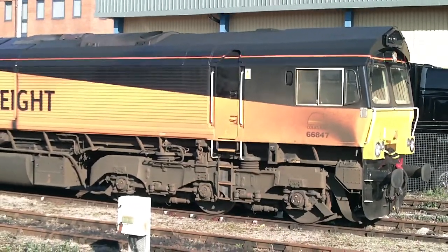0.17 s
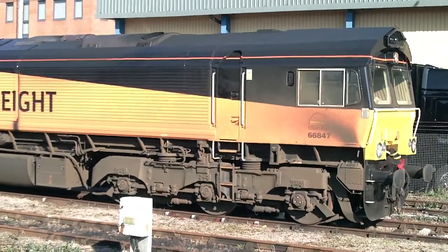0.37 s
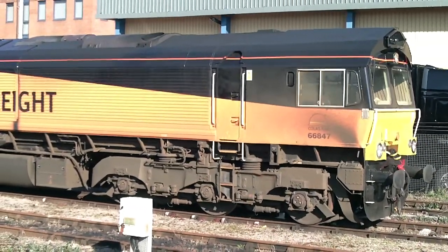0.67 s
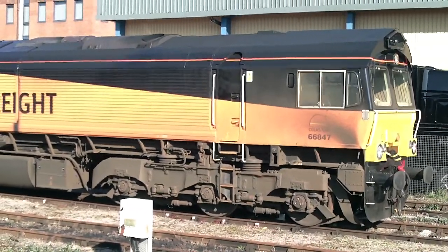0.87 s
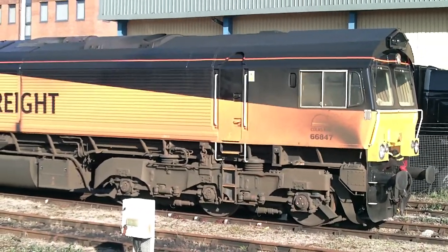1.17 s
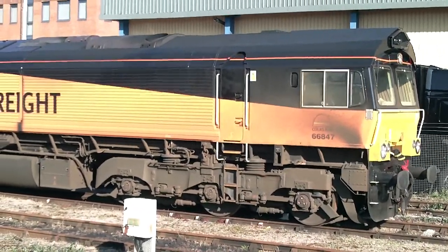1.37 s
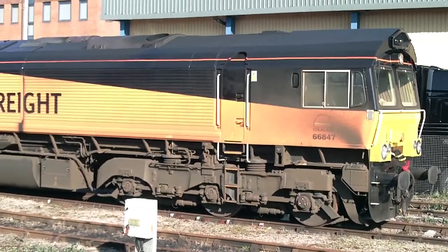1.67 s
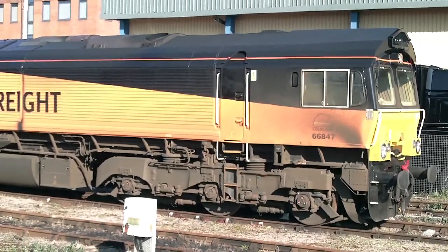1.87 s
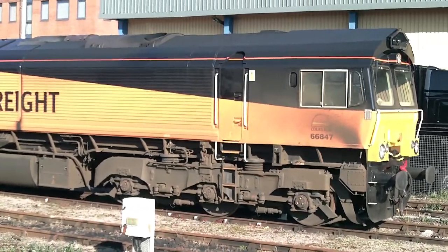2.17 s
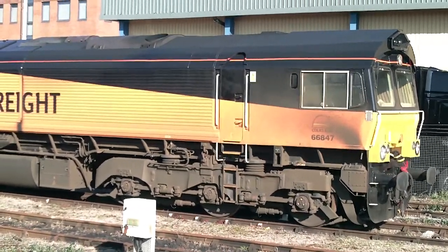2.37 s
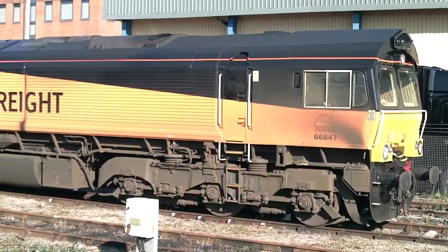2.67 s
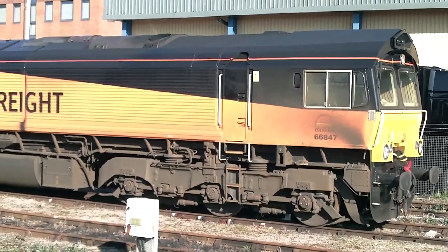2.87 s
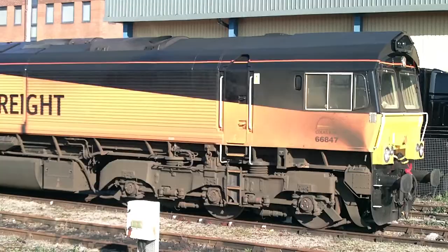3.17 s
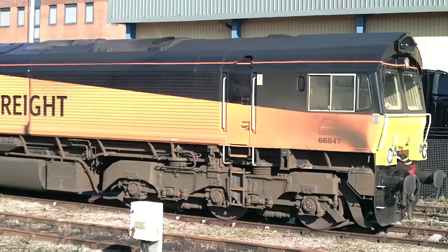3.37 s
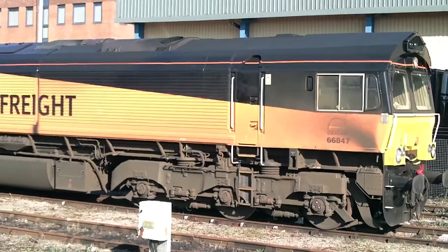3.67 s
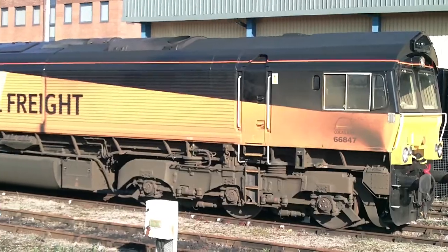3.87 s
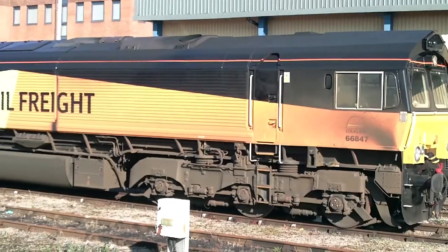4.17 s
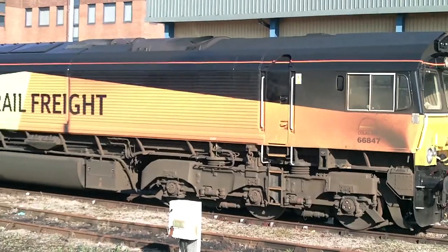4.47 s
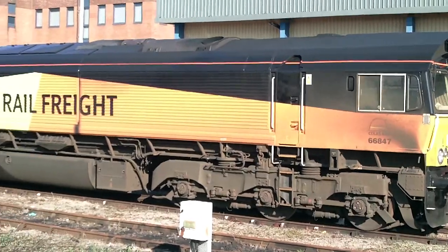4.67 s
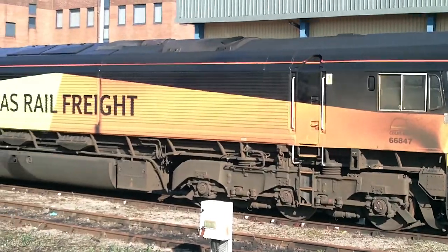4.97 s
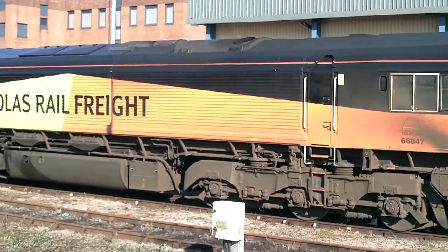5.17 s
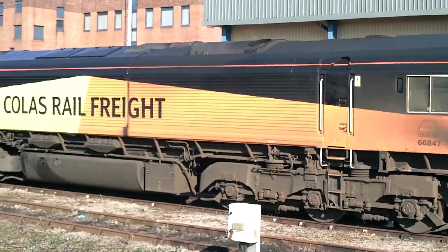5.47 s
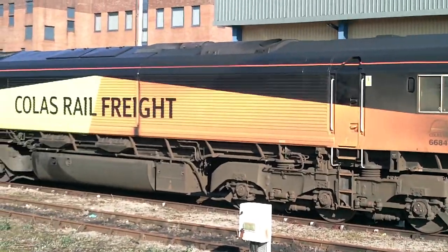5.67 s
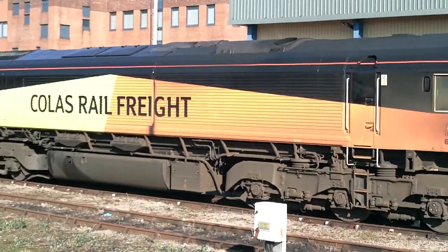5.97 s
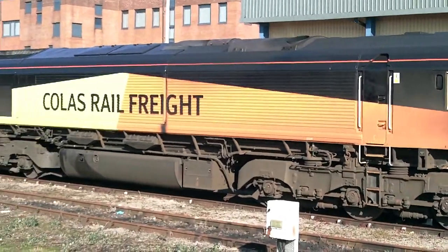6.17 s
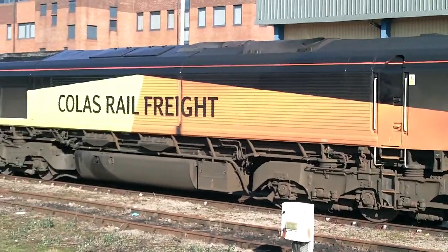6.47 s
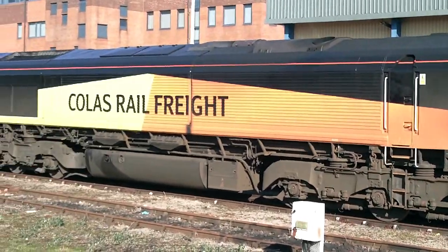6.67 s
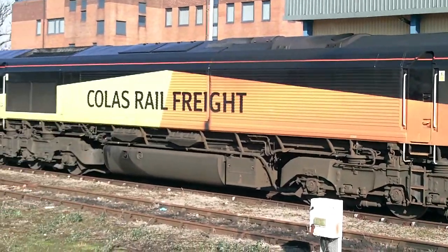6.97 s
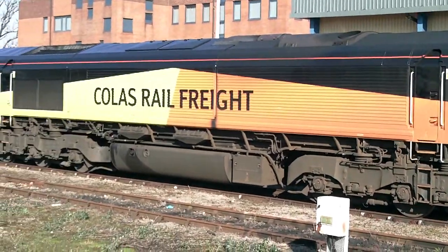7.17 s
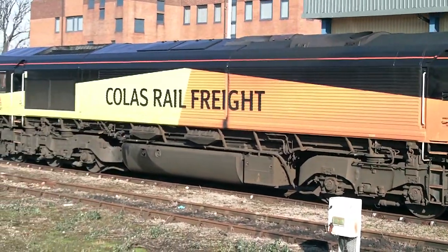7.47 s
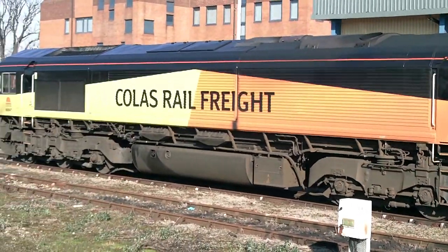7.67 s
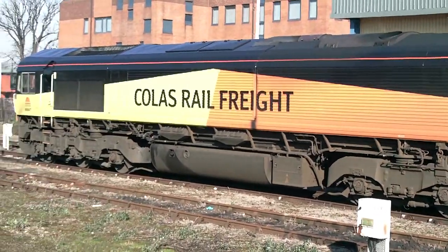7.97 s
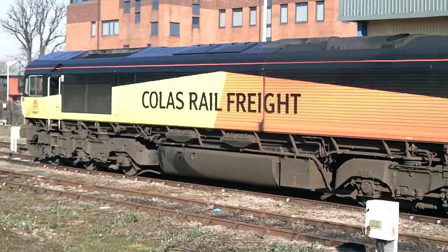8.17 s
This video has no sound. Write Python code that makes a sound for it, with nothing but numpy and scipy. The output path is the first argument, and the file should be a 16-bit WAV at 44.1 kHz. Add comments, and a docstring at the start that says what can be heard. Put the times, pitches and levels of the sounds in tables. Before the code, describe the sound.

Steady locomotive idle, fairly close, outdoors, captured by a stereo microphone pair. Low booming exhaust pulses and rattling engine knocks cycle rapidly without changing speed, beneath pulsing gear tones and a constant high whistle. A quick burst of compressed air comes just after the start and dies away fast. Later the airy treble brightens slightly, with two barely audible thin squeals. No voices.

```python
"""A big two-stroke diesel locomotive idles in a rail yard, heard from the side of the track.
Every crank turn repeats, slightly varied, the same exhaust beats and knocks as pulses ringing resonant modes.
Valve gear taps clatter, and gear tones and harmonics follow the crank as sines. The turbocharger whistles as
smeared tones above a steady roar of coloured noise. An air valve lets off short hisses of resonant noise,
and a faint thin squeal twice glides up and back down."""
import sys
import numpy as np
from scipy import signal
from scipy.fft import rfft, irfft, next_fast_len
from scipy.io import wavfile

SR = 44100
rng = np.random.default_rng(int(sys.argv[2]) if len(sys.argv) > 2 else 0)


def to_wav(sig):
    """Store sig (one row per channel, or 1-D mono) as 16-bit WAV at the path in sys.argv[1].

    Samples outside -1..1 are clipped; the rate is SR.
    """
    pcm = np.clip(np.atleast_2d(sig), -1, 1) * 32767
    pcm = np.round(pcm).astype(np.int16)
    wavfile.write(sys.argv[1], SR, pcm.T)  # frames by channels


N = 367794
TIME = np.arange(N) / SR
SIZE = next_fast_len(N + SR)
HZ = np.maximum(np.arange(SIZE // 2 + 1) * SR / SIZE, 1)


def amp(db):
    """dB to gain."""
    return 10 ** (np.asarray(db) / 20)


def rms_one(x):
    """Scale to rms 1."""
    return x / np.sqrt(np.mean(x ** 2) + 1e-20)


def in_time(rows):
    """Columns of a curve table at every sample."""
    s, *columns = np.transpose(rows)
    return [np.interp(TIME, s, column) for column in columns]


def at_hz(points):
    """A spectrum table at every FFT bin, straight lines over log frequency."""
    hz, value = np.transpose(points)
    return np.interp(np.log(HZ), np.log(hz), value)


def band(x, kind, hz, order=4):
    """Butterworth filter."""
    return signal.sosfilt(signal.butter(order, hz, kind, fs=SR, output="sos"), x)


def drift(rate_hz):
    """Slow chance: noise at every eighth sample, twice through a one-pole low-pass; spread 1."""
    r = np.exp(-2 * np.pi * rate_hz * 8 / SR)
    noise = rng.standard_normal(N // 8 + 6002)
    slow = signal.lfilter([1], [1, -2 * r, r * r], noise)[6000:]  # drop the filter's start
    return np.interp(np.arange(N) / 8, np.arange(len(slow)), rms_one(slow - slow.mean()))


def stereo_noise(spectrum, likeness):
    """Coloured noise, partly alike in both channels."""
    alike = np.clip(likeness, 0, 1)
    mid, side = rfft(rng.standard_normal((2, SIZE))) * amp(at_hz(spectrum))
    pair = np.sqrt(1 + alike) * mid + np.sqrt(1 - alike) * side * [[1], [-1]]
    return irfft(pair, SIZE)[:, :N] / np.sqrt(2)


def whine(hz, width_hz):
    """A tone smeared into a narrow band: a sine times slow noise in two phases."""
    phase = 2 * np.pi * np.cumsum(np.broadcast_to(hz, N)) / SR
    return drift(width_hz) * np.cos(phase) + drift(width_hz) * np.sin(phase)


def ring(clicks, hz, level_db, t60_s):
    """A two-pole resonator: every click sets off a decaying sine."""
    r = 10 ** (-3 / (t60_s * SR))
    w = 2 * np.pi * hz / SR
    return signal.lfilter([0, amp(level_db) * np.sin(w)], [1, -2 * r * np.cos(w), r * r], clicks)


RUN_IN_TURNS = 3  # the engine is already ringing at the start


def looped(contacts, modes, turns, uneven, jitter_s):
    """The contacts of one turn, repeated every turn with small changes, ring a set of modes."""
    degrees, strength = np.transpose(contacts)
    lead = int(RUN_IN_TURNS / turns[0])
    turns = np.r_[turns[0] * np.arange(1 - lead, 1), turns]
    due = np.arange(-RUN_IN_TURNS, int(turns[-1]) + 1)[:, None] + degrees / 360
    at = np.interp(due, turns, np.arange(lead + N))
    at += jitter_s * SR * rng.standard_normal(due.shape)
    sizes = strength * (1 + uneven * rng.standard_normal(due.shape))
    played = due < turns[-1]
    clicks = np.full(lead + N, 1e-18)
    np.add.at(clicks, np.clip(at[played].astype(int), 0, lead + N - 1), sizes[played])
    return sum(ring(clicks, *mode) for mode in modes)[lead:]


def with_answer(contacts, answer):
    """Every contact is followed by a weaker copy of itself, turned over by a negative share."""
    later, share = answer
    return contacts + [(degrees + later, strength * share) for degrees, strength in contacts]


IDLE_TURNS_PER_S, SAG_TURNS_PER_S, RECOVERY_S = 5.71851, .015172, 2.58


def crankshaft():
    """Turns so far: the crank starts a little slow and recovers exponentially to governed idle speed."""
    return np.cumsum(IDLE_TURNS_PER_S - SAG_TURNS_PER_S * np.exp(-TIME / RECOVERY_S)) / SR


# exhaust beats in one turn, pushes and pulls: crank_deg, signed_strength (relative)
EXHAUST_BEATS = [(16.0, .05), (52.8, .08), (80.9, -.12), (88.5, .06), (96.3, -.12), (113.2, -.08),
                 (121.4, .13), (148.6, .05), (166.6, .19), (192.1, .07), (211.0, .08), (243.3, .12),
                 (254.3, .15), (288.5, .12), (307.8, .07), (312.2, -.11), (337.1, -.05), (343.2, -.08),
                 (346.1, .08), (354.6, -.1)]
# suction after every beat: later_deg, share (of the beat)
SUCTION = (19.5, -.77)
# silencer resonances: mode_hz, level_db (relative), t60_s
SILENCER_MODES = [(43.5, -1.6, .174), (70, 1.5, .142), (87.5, -9.2, .23), (139.7, -16.7, .156),
                  (182.1, -5.2, .075), (283.4, -5, .058)]


def exhaust(turns):
    """Pressure pulses, each answered by suction, boom through the silencer's low modes."""
    beats = with_answer(EXHAUST_BEATS, SUCTION)
    boom = looped(beats, SILENCER_MODES, turns, uneven=.12, jitter_s=.00015)
    return amp(0.9) * band(boom, "low", 340)


# knocks of pistons, valves and injectors in one turn: crank_deg, signed_strength (relative)
ENGINE_KNOCKS = [(14.9, .14), (29.7, .16), (37.8, -.1), (42.8, .11), (49.5, .08), (55.4, .17), (68.9, .13),
                 (76.6, .19), (92.0, -.11), (100.9, .16), (107.3, -.1), (119.4, .11), (126.0, .23),
                 (131.3, .14), (138.4, .25), (143.5, -.23), (154.5, .17), (165.8, -.12), (180.6, -.07),
                 (187.2, .08), (196.3, .1), (204.9, -.1), (212.6, -.1), (218.4, -.1), (232.2, -.12),
                 (241.8, .11), (253.7, -.14), (258.2, .31), (265.6, .18), (277.1, -.08), (289.6, -.1),
                 (294.5, .15), (306.9, .08), (317.0, .29), (336.5, .11), (354.0, -.15)]
# rebound after every knock: later_deg, share (of the knock)
REBOUND = (5.15, -.68)
# engine block resonances: mode_hz, level_db (relative), t60_s
BLOCK_MODES = [(473.6, -7.1, .12), (550.9, -20.9, .118), (621.6, -6.4, .025), (664.4, -14, .197),
               (703.3, -7.7, .103), (740.9, -32.4, .59), (877.8, -29.3, .3)]


def knocks(turns):
    """Mechanical impacts, each with a rebound, ring the engine block above the exhaust."""
    impacts = with_answer(ENGINE_KNOCKS, REBOUND)
    rattle = looped(impacts, BLOCK_MODES, turns, uneven=.1, jitter_s=.00002)
    return band(rattle, "band", [360, 940])


# short metallic valve gear taps in one turn: crank_deg, ring_hz, level_db
VALVE_GEAR_TAPS = [(20, 2950, -39), (90, 1815, -30), (97, 2950, -40), (110, 1352, -25), (133, 2000, -35),
                   (140, 2960, -38), (255, 1900, -37), (318, 1340, -33)]
TAP_T60_S = 0.094


def clatter(turns):
    """Each tap returns every turn, a little early or late, and rings briefly at its own pitch."""
    out = np.zeros(N)
    for degrees, hz, level_db in VALVE_GEAR_TAPS:
        out += looped([(degrees, 1)], [(hz, level_db, TAP_T60_S)], turns, uneven=.25, jitter_s=.00005)
    return out


# clean harmonics of the crank that stand out of the beats: cycles_per_turn, level_db (rms, before wavering)
CRANK_HARMONICS = [(18, -34), (19, -43), (20, -44), (21, -38), (36, -37), (38, -44), (45, -40), (54, -45),
                   (57, -44), (59, -44), (66, -46), (72, -47), (73, -46), (90, -47), (136, -47), (139, -47),
                   (140, -49), (141, -47), (142, -46), (144, -40), (157, -43), (237, -49), (315, -59),
                   (325, -55), (340, -57)]


def harmonics(turns):
    """Sines locked to the crank, wavering a little in level and barely in phase."""
    out = np.zeros(N)
    for per_turn, level_db in CRANK_HARMONICS:
        gain = np.sqrt(2) * amp(level_db + drift(3.0))
        out += gain * np.sin(2 * np.pi * per_turn * turns + .002 * per_turn * drift(3.0))
    return out


# the loudest gear tone: cycles_per_turn, start_rad, load_peak_deg (crank angle), load_lag_rad
MAIN_GEAR_TONE = (117.255, -1.03, 78, .63)
MAIN_GEAR_DB, MAIN_GEAR_SWELL_DB = -30.5, 6


def main_gear(turns):
    """A steady ringing tone; once a turn the load swells it and holds it back a little."""
    per_turn, start, degrees, lag = MAIN_GEAR_TONE
    load = np.cos(2 * np.pi * (turns - degrees / 360))
    phase = 2 * np.pi * per_turn * turns + start - lag * load + 0.29 * drift(3.3)
    level_db = MAIN_GEAR_DB + MAIN_GEAR_SWELL_DB * load + drift(4.4)
    return np.sqrt(2) * amp(level_db) * np.sin(phase)


# gear trains and auxiliaries: cycles_per_turn
GEAR_TONES = [17.745, 58, 81.7, 84.75, 200, 227, 234.51, 353, 468.8, 504, 516, 525, 552, 570, 586, 624, 636]
# load on each of those tones: level_db (rms, before the swell), swell_db (once a turn), swell_peak_deg
GEAR_LOADS = [(-35, 0, 0), (-41, 0, 0), (-45, 0, 0), (-48, 0, 0), (-46, .6, 120), (-47, 4, 120),
              (-43, 6, 105), (-51, 5, 110), (-55, 2, 80), (-57, 4, 80), (-52.5, 7, 80), (-54, 4, 90),
              (-58, 3, 70), (-56, 3, 70), (-52, 7, 90), (-59, 2, 20), (-61, 2, 20)]


def gears(turns):
    """Meshing teeth follow the crank; the load on them swells once a turn, backlash makes them waver."""
    out = np.zeros(N)
    for per_turn, (level_db, swell_db, degrees) in zip(GEAR_TONES, GEAR_LOADS):
        load_db = swell_db * np.cos(2 * np.pi * (turns - degrees / 360)) + 1.4 * drift(8.0)
        backlash = 0.002 * per_turn * drift(4.25)  # radians, more for finer teeth
        out += amp(level_db + load_db) * np.sin(2 * np.pi * per_turn * turns + backlash)
    return np.sqrt(2) * out


# turbocharger whistle: time_s, pitch_hz (before wavering)
TURBO_PITCH = [(0, 5375), (2, 5372), (4.9, 5370), (5.0, 5395), (5.42, 5392), (5.5, 5440), (5.76, 5445),
               (5.86, 5405), (6.1, 5365), (6.25, 5385), (8.34, 5375)]
TURBO_DB = -36


def turbocharger():
    """A breathy whistle with a wider smear of opposite sign left and right, an octave and a neighbour."""
    hz = in_time(TURBO_PITCH)[0] + 12.0 * drift(6.9)
    whistle = whine(hz, 49.6)
    scattered = amp(-13.5) * whine(hz, 55.0) * [[1], [-1]]
    octave = amp(-29) * whine(2 * hz, 90.0)
    neighbour = amp(-22) * whine(6005, 35.0)
    return amp(TURBO_DB + 0.41 * drift(7.0)) * (whistle + scattered + octave + neighbour)


# air valve puffs: start_s, opening_s, peak_db (pressure as gain)
VALVE_PUFFS = [(0, 0.063, -51), (.485, 0.037, -32)]
VALVE_HOLD_S, VALVE_FADE_DB_PER_S = 0.057, 38


def puffs():
    """Pressure at the valve as gain: each puff swells while the valve opens, holds, then fades evenly in dB."""
    out = np.full(N, 1e-9)
    for start, opening, peak_db in VALVE_PUFFS:
        swell = np.clip((TIME - start) / opening, 0, 1) ** 2
        fading_s = np.clip(TIME - start - opening - VALVE_HOLD_S, 0, None)
        out += swell * amp(peak_db - VALVE_FADE_DB_PER_S * fading_s)
    return out


# colour of the air jet: freq_hz, density_db (relative)
JET_SPECTRUM = [(700, -8), (1400, 12.5), (2600, 10), (4200, 12.5), (4900, 4.5), (5700, 9), (6100, 12.5),
                (6700, 14), (7300, 13), (7600, 11), (8400, 7), (10000, 8), (10400, 5.5), (15000, -2)]
# resonances of the valve body, a lingering row and a short-lived row: mode_hz
VALVE_BODY_MODES = [(2420, 2600, 2810, 3020, 3210), (1950, 3670, 4110, 4400, 6150, 6710, 7200, 8450, 10300)]
LINGER_S = .12


def air_valve():
    """A jet of compressed air; valve body resonances streak it and one set rings on after the hiss."""
    pressure = puffs()
    jet = stereo_noise(JET_SPECTRUM, at_hz([(3000, .8), (9000, .58)]))
    jet /= np.std(band(jet, "band", [8200, 12000]))  # the treble sets the level
    long_body, short_body = (sum(band(jet, "band", [hz - 30, hz + 30], order=1) for hz in modes)
                             for modes in VALVE_BODY_MODES)
    step = 1 / (LINGER_S * SR)
    lingering = np.sqrt(signal.lfilter([step], [1, step - 1], pressure ** 2))
    hiss = pressure * (jet + amp(3) * short_body)
    return hiss + amp(8.5) * np.maximum(lingering, pressure) * long_body


# faint thin squeals: top_s, half_length_s, low_hz, top_hz, level_db
SQUEAL_GLIDES = [(4.2, .33, 10500, 12200, -70), (6.92, .22, 10900, 13200, -68)]


def squeals():
    """Thin smeared tones that glide up to a top and back down."""
    out = np.zeros(N)
    for top_s, half_s, low_hz, top_hz, level_db in SQUEAL_GLIDES:
        arch = np.clip(1 - np.abs(TIME - top_s) / half_s, 0, 1)
        hz = low_hz + (top_hz - low_hz) * np.sin(arch * np.pi / 2)
        out += amp(level_db) * np.minimum(arch * 8, 1) * whine(hz, 30.0)
    return out


# roar of combustion, intake and fans, before swell and flicker: freq_hz, density_db (per Hz)
ROAR_SPECTRUM = [(20, -56), (57, -39.5), (75, -47), (100, -51), (150, -54), (230, -55), (330, -60),
                 (400, -59), (540, -54), (660, -50), (800, -60), (920, -58.5), (1100, -62), (1420, -59),
                 (1600, -69), (1950, -62), (2300, -67), (3300, -70), (5000, -79), (6500, -80), (7000, -85),
                 (7350, -84), (7550, -90), (8050, -90), (8450, -86), (8800, -85), (9400, -90), (10100, -92),
                 (11800, -89), (12500, -93), (14500, -108)]
# stereo width of the roar: freq_hz, likeness (left-right correlation, 0 to 1)
ROAR_LIKENESS = [(40, 0.96), (430, 0.95), (1200, 0.95), (2800, 0.89), (4300, 0.87), (6000, 0.8),
                 (12000, 0.75)]
# gain of the roar's treble: time_s, level_db (before flicker)
ROAR_TREBLE = [(0, -24), (2.8, -9.5), (3.6, -6.5), (5.7, -8.5), (6.1, -5), (7, -6.5), (7.6, -11),
               (8.34, -9.5)]
SURGE_DB = 6  # slow surges of the deepest rumble


def roar(turns):
    """Broad noise; above the knocks it swells a little once a turn, its treble flickers, its bass surges."""
    noise = np.sqrt(SR / 2) * stereo_noise(ROAR_SPECTRUM, at_hz(ROAR_LIKENESS))
    swell_db = 0.51 * np.cos(2 * np.pi * (turns - .3)) + .5 * drift(28.0) + 0.4 * drift(1.33)
    rumble = band(noise, "low", 80, order=2)
    low = band(noise, "low", 2800, order=2)
    top = band(noise, "high", 6140, order=2)
    flicker = amp(in_time(ROAR_TREBLE)[0] + 1.5 * drift(10.0))
    surge = (amp(SURGE_DB * drift(1.7)) - 1) * rumble
    return surge + low + amp(swell_db) * (noise - low + (flicker - 1) * top)


# level lean of the microphone pair: freq_hz, left_minus_right_db
LEVEL_LEAN = [(21, -2), (43, -2), (96, 0), (150, .5), (430, 0.6), (800, 1), (2600, 0.7), (4300, 2.3),
              (6000, 2.3), (8000, .5), (12000, 1.2)]
# phase lean of the microphone pair: freq_hz, left_lead_rad
PHASE_LEAN = [(21, .54), (43, .47), (96, .27), (150, .17), (430, .04), (1000, 0)]


def microphone_pair(sound):
    """The two microphones differ a little in level and bass phase, half the difference on each side."""
    # a fading mirrored tail keeps the circular filter from clicking
    run_out = np.clip((SIZE - np.arange(SIZE)) / (SIZE - N), 0, 1) ** 2
    sound = run_out * np.pad(sound, ((0, 0), (0, SIZE - N)), "reflect", reflect_type="odd")
    side = np.array([[.5], [-.5]])
    lean = amp(at_hz(LEVEL_LEAN) * side) * np.exp(1j * at_hz(PHASE_LEAN) * side)
    return irfft(rfft(sound) * lean, SIZE)[:, :N]


def scene():
    """All sources on one crankshaft, heard by the microphone pair."""
    turns = crankshaft()
    engine = exhaust(turns) + knocks(turns) + clatter(turns) + harmonics(turns)
    gear_train = main_gear(turns) + gears(turns)
    air = turbocharger() + air_valve() + squeals() + roar(turns)
    return microphone_pair(engine + gear_train + air)


NOTCH_HZ, CUTOFF_HZ = 7790, 15000


def record(dry):
    """Bass cut, a narrow notch in the treble, short end fades, rounded peaks, steep top cut."""
    x = band(dry, "high", 22, order=2)
    for _ in range(2):
        x = signal.lfilter(*signal.iirnotch(NOTCH_HZ, 30.0, fs=SR), x)
    fades = np.clip(np.minimum(TIME / .004, (TIME[-1] - TIME) / .002), 0, 1)
    x = 1.7 * np.tanh(x / 1.7) * fades
    top_cut = signal.ellip(10, .5, 70, CUTOFF_HZ, fs=SR, output="sos")
    return np.clip(signal.sosfilt(top_cut, x), -1, 1)


dry = scene()
out = record(dry)
to_wav(out)
```